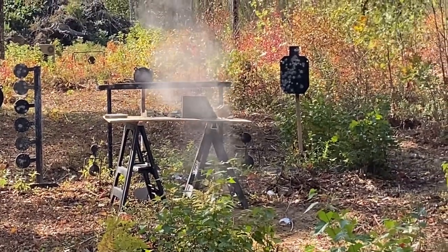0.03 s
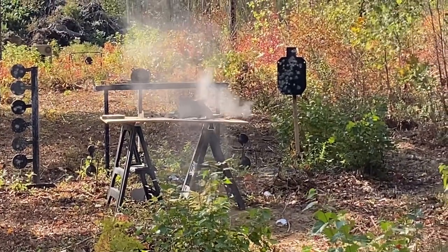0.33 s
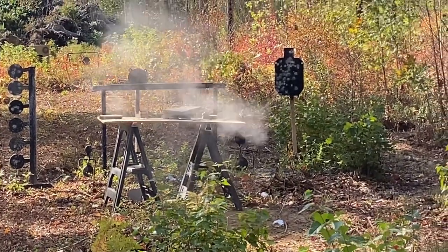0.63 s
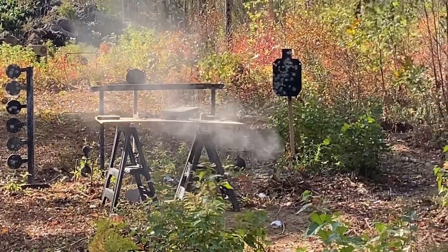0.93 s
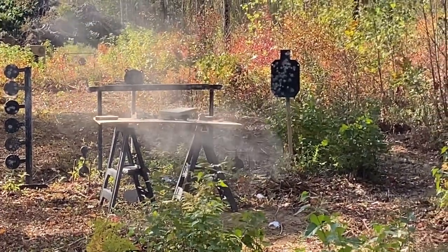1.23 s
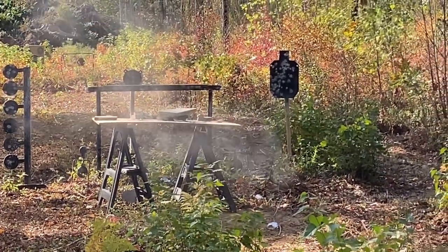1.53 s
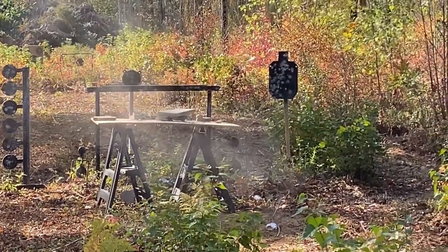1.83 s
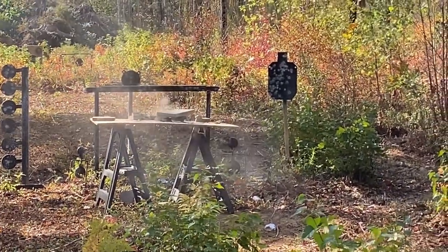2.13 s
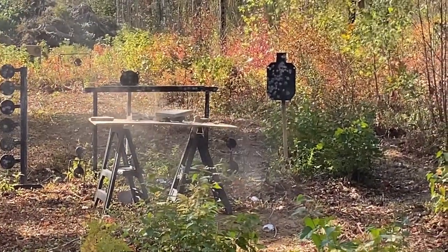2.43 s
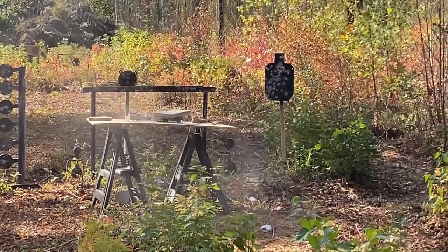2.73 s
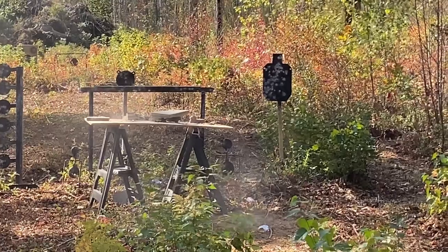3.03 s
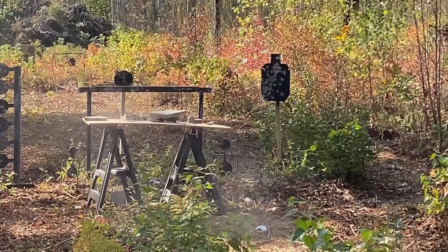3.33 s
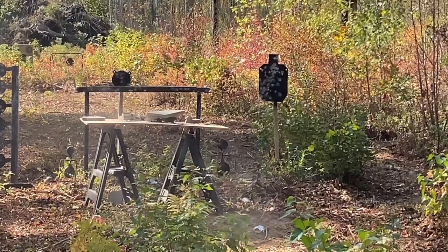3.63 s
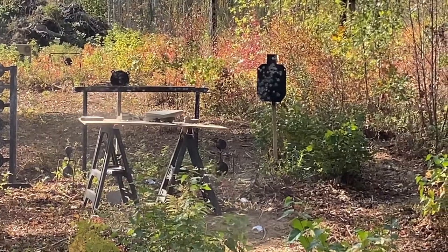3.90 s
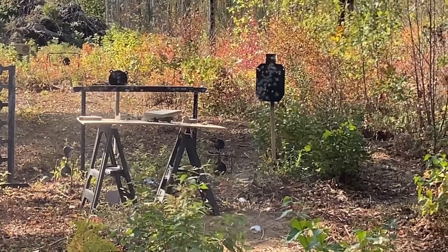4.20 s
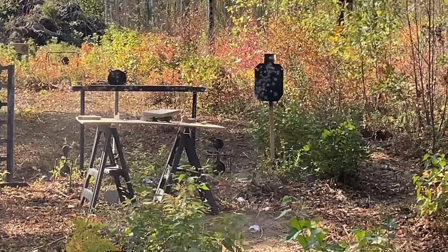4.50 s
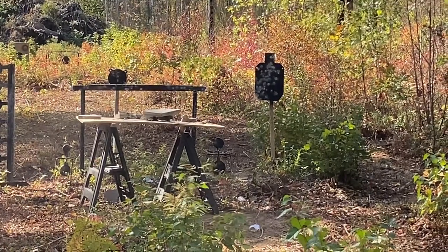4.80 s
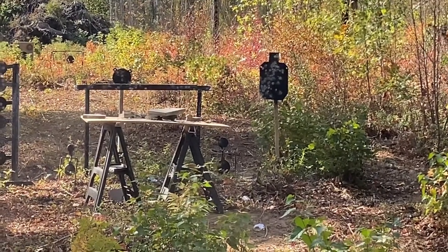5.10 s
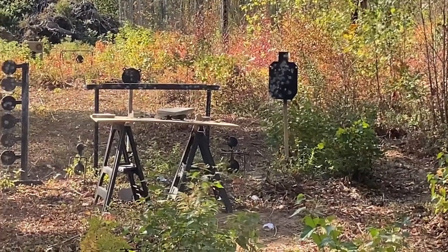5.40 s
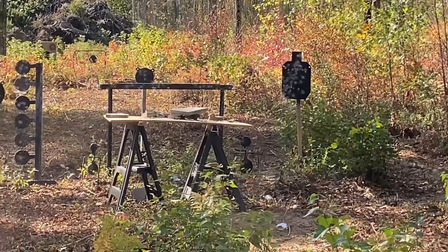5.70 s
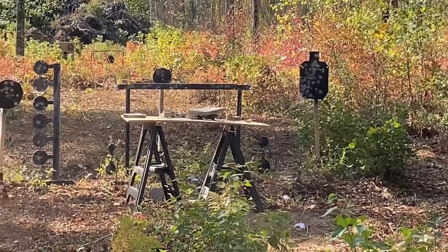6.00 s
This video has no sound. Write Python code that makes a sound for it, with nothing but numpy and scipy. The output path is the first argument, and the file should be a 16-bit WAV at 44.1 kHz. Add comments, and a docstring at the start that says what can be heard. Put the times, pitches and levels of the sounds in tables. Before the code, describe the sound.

Eight sharp gunshots fire at an uneven pace on an outdoor range, the later ones hitting steel targets that clang and ring.

```python
"""Eight gunshots at an uneven pace, from a microphone pair beside the shooter on a range by a wood.
Each is a sharp crack and a muzzle blast, scattered by the ground close by, echoed by the range
and held by the trees farther off. Downrange, four of the last five bullets set steel ringing.
A few faint dull thumps fall between and after the shots, over the low rumble of still outdoor air."""
import sys
import numpy as np
from scipy import signal
from scipy.fft import rfft, irfft, next_fast_len
from scipy.io import wavfile

SR = 44100
rng = np.random.default_rng(int(sys.argv[2]) if len(sys.argv) > 2 else 0)


def int16_out(signal):
    """Quantize to a 16-bit WAV file."""
    q = np.round(np.clip(np.atleast_2d(signal).T, -1, 1) * 32767)
    wavfile.write(sys.argv[1], SR, q.astype(np.int16))


N = 271215
SIZE = 54000  # samples in one shot and its tail
AGE = np.arange(SIZE) / SR
HZ = np.maximum(np.arange(SIZE // 2 + 1) * SR / SIZE, 1)
SIDE = np.array([[-.5], [.5]])  # splits a difference between left and right

# Colour of the crack, also of the steel's splash and shimmer. Each row: frequency in Hz, level in dB.
CRACK_SPECTRUM = [(200, -32), (700, -5), (1400, -9), (2400, -10), (4000, -16), (6200, -19.5), (8500, -14),
                  (10200, -7), (11800, -5), (13500, -20.5), (15500, -32.5)]


def undb(db):
    """Decibels to gain."""
    return 10 ** (np.asarray(db) / 20)


def fade(age, t60):
    """Full level until age zero, then down 60 dB every t60 seconds."""
    return np.exp(-np.log(1000) * np.maximum(age, 0) / t60)


def along(points, hz):
    """Read (Hz, value) points on a log-frequency axis."""
    point_hz, value = np.transpose(points)
    return np.interp(np.log(np.maximum(hz, 1)), np.log(point_hz), value)


def bins(x):
    """The frequencies of a signal's spectrum."""
    return np.arange(x.shape[-1] // 2 + 1) * SR / x.shape[-1]


def causal(points):
    """Minimum-phase response of a (Hz, dB) spectrum."""
    cepstrum = irfft(np.log(undb(along(points, HZ))))
    cepstrum[1:SIZE // 2] *= 2
    cepstrum[SIZE // 2 + 1:] = 0
    return np.exp(rfft(cepstrum))


def add(out, start_s, sound):
    """Mix a sound in, cut short of the buffer's end, where filtering wraps round."""
    start = int(start_s * SR)
    sound = sound[..., :min(N - start, SIZE - SIZE // 16)]
    out[:, start:start + sound.shape[-1]] += sound


def diffuse(size):
    """Spectra of white noise reaching the two microphones from all round."""
    # Each row: frequency in Hz, share of the power that differs between the microphones.
    unrelated = [(100, 0.1), (300, 0.27), (650, 0.86), (3800, 0.8), (4600, 0.017)]
    common, left, right = rng.standard_normal((3, size))
    own = along(unrelated, bins(common))
    return np.sqrt(1 - own) * rfft(common) + np.sqrt(own) * rfft([left, right])


def air():
    """Still outdoor air all round the microphones, with a low rumble."""
    # Each row: frequency in Hz, level in dB.
    spectrum = [(20, -60.5), (55, -41), (125, -59), (220, -63.5), (420, -59.5), (1000, -57), (2000, -68.5),
                (4000, -89.5), (7000, -102), (10500, -92.5), (15000, -103)]
    size = next_fast_len(N)
    hz = np.arange(size // 2 + 1) * SR / size
    return irfft(diffuse(size) * undb(along(spectrum, hz)), size)[:, :N]


def crack(rise_s=0.0012, hold_s=0.0024, t60=0.013):
    """A few milliseconds of ragged shock fronts."""
    burst = irfft(diffuse(SIZE)) * np.minimum(AGE / rise_s, 1) ** 2 * fade(AGE - hold_s, t60)
    return irfft(rfft(burst) * causal(CRACK_SPECTRUM))


def pulse(points, sweep_cycles=1.274, knee_hz=12):
    """Spectrum of one pressure pulse as heard: its lows come late, so that it sweeps down into a thud."""
    return causal(points) * np.exp(-2j * np.pi * sweep_cycles * np.log((HZ + knee_hz) / SR))


def blast(dull_hz=3000, lag_s=0.0021):
    """Spectrum of the muzzle blast at close range, just behind the crack."""
    # Each row: frequency in Hz, level in dB ahead of the low-pass.
    spectrum = [(20, 14.5), (35, 22.5), (60, 34), (140, 36), (205, 34.5), (255, 26.5), (292, 32),
                (355, 25.5), (465, 36.5), (520, 32.5), (625, 18), (830, 27), (1400, 18.5), (2500, 4.5)]
    lowpass = 1 / (1 + 1j * HZ / dull_hz - (HZ / dull_hz) ** 2)
    return pulse(spectrum) * lowpass * np.exp(-2j * np.pi * HZ * lag_s)


def scatter(rise_s=0.001, t60=0.18):
    """Dense early reflections from leaf litter and benches close by."""
    # Each row: frequency in Hz, level in dB.
    spectrum = [(30, -20), (80, -6), (220, -4), (420, -11.5), (630, -9), (1000, -4), (1400, -6.5),
                (2200, -14), (3500, -20), (6000, -31.5), (8500, -25.5), (10800, -15), (13000, -24),
                (15500, -47.5)]
    burst = irfft(diffuse(SIZE)) * np.minimum(AGE / rise_s, 1) * fade(AGE, t60)
    return irfft(rfft(burst) * causal(spectrum))


def echoes(smear_s=.0016, size=1024, deep_s=0.15, deep_width_s=0.012):
    """Response of rough reflectors: a broad bright band from near, a narrow low one from the trees."""
    # Ground, berms and trunks. Each row: delay in seconds, level in dB.
    reflectors = [(.0052, 3.5), (0.0212, -5), (0.0375, -20), (.0740, -13.5), (0.1272, -20.5), (0.1724, -22),
                  (0.191, -18), (0.232, -31), (0.323, -28.5)]
    near_hz, near_octaves = 1070, 0.96
    far_hz, far_octaves = 413, 0.64
    lag = np.arange(size) - size // 2
    window = np.exp(-.5 * (lag / SR / smear_s) ** 2)
    out = np.zeros((2, SIZE))
    for delay_s, db in reflectors:
        depth = .5 + .5 * np.tanh((delay_s - deep_s) / deep_width_s)  # 0 close by, 1 deep in the wood
        hz = near_hz + depth * (far_hz - near_hz)
        octaves = near_octaves + depth * (far_octaves - near_octaves)
        band = np.exp(-.5 * (np.log2((bins(lag) + 1) / hz) / octaves) ** 2)
        burst = irfft(rfft(irfft(diffuse(size)) * window) * band)
        burst *= np.sqrt(2 * np.mean(band ** 2) / np.sum(burst ** 2))  # about unit gain mid-band
        out[:, lag + int(delay_s * SR)] += undb(db) * burst
    return rfft(out)


def surroundings(muzzle):
    """What the range sends back early: echoes of the blast and scatter from the ground."""
    return irfft(muzzle * echoes()) + scatter()


def trunks(patchy_db=1.0, patch_s=0.0029, clearing_db=-1.5, edge_s=0.14, edge_width_s=0.004):
    """Strength of the patchy returns by delay: weaker from the clearing, fuller from the trees."""
    knots = np.arange(0, AGE[-1], patch_s)
    patches_db = patchy_db * np.interp(AGE, knots, rng.standard_normal(SIZE)[:len(knots)])
    in_clearing = .5 - .5 * np.tanh((AGE - edge_s) / edge_width_s)
    return undb(patches_db + clearing_db * in_clearing)


def woods(patches, rise_s=0.03, hold_s=0.18):
    """The wood holds the shot while the front crosses the tree line, then fades band by band."""
    # Each row: frequency in Hz, level in dB.
    spectrum = [(25, -34.5), (45, -22.5), (70, -24.5), (220, -33), (400, -23.5), (650, -27.5),
                (1150, -23.5), (2200, -35.5), (3500, -44), (6000, -59), (10800, -50.5), (12800, -62.5),
                (15500, -78)]
    # Each row: band centre in Hz, seconds to fall 60 dB.
    decay = [(50, 1.2), (150, 0.66), (400, 1.1), (1000, 1.16), (2200, 0.91), (5000, 0.58), (11000, 0.76)]
    returns = rfft(irfft(diffuse(SIZE)) * patches) * undb(along(spectrum, HZ))
    centres, t60s = np.transpose(decay)
    out = 0
    for share, t60 in zip(np.eye(len(centres)), t60s):
        band = along(np.c_[centres, share], HZ)
        out += irfft(returns * band) * fade(AGE - hold_s, t60)
    return out * np.minimum(AGE / rise_s, 1)


def boom(hz=48, level_db=-40, peak_s=0.16, spread_s=0.041):
    """A deep note that rolls back across the range."""
    swell = np.exp(-.5 * ((AGE - peak_s) / spread_s) ** 2)
    return undb(level_db) * swell * np.sin(2 * np.pi * hz * AGE)


def gun(fresh_share=0.36):
    """Shots beside the microphones. All meet the same range and trees, so most early echoes repeat."""
    # Each row: start in seconds, gain of the blast and its returns in dB, gain of the crack in dB.
    shots = [(0.189, -3.5, -3), (1.263, -2.87, 0.5), (1.9376, -3, 2), (3.1635, -2, 0), (3.4724, -2.3, 1),
             (4.0183, -2.35, 0), (4.4946, -2.5, 2), (4.946, -2.5, 2)]
    out = np.zeros((2, N))
    muzzle, roll, patches = blast(), boom(), trunks()
    direct, usual = irfft(muzzle), surroundings(muzzle)
    for start_s, blast_db, crack_db in shots:
        early = np.sqrt(1 - fresh_share) * usual + np.sqrt(fresh_share) * surroundings(muzzle)
        report = direct + early + woods(patches) + roll
        add(out, start_s, undb(blast_db) * report + undb(crack_db) * crack())
    return out


def thumps():
    """Faint dull thumps, each one low pressure pulse."""
    # Each row: start in seconds, gain in dB.
    events = [(0.946, -39.5), (1.001, -43.5), (1.134, -45.5), (2.828, -40.5), (2.925, -39.5), (3.004, -34),
              (3.049, -38), (6.099, -38.5)]
    # Each row: frequency in Hz, level in dB.
    spectrum = [(20, 7), (55, 40), (120, 27.5), (300, 11), (600, -1), (2000, -16.5), (6000, -60)]
    out = np.zeros((2, N))
    thump = irfft(pulse(spectrum))
    for start_s, db in events:
        add(out, start_s, undb(db) * thump)
    return out


def ring(modes, size, strike_db, waver_db, waver_s=0.082):
    """Decaying modes: the strike point weights them by chance, and their levels waver slowly at random."""
    age = np.arange(size) / SR
    knots = np.arange(0, N / SR, waver_s)
    out = 0
    for hz, db, t60 in modes:
        chance = rng.standard_normal(SIZE // 64)
        waver = np.interp(age, knots, chance[:len(knots)])
        gain = undb(db + strike_db * chance[-1] + waver_db * waver)
        out += gain * fade(age, t60) * np.sin(2 * np.pi * hz * age)
    return out


def shimmer(size, count=30, low_hz=4500, high_hz=15000, gain_db=-44, t60=0.6):
    """The steel's crowded high modes: each bullet wakes a different handful."""
    hz = rng.uniform(low_hz, high_hz, count)
    modes = np.c_[hz, gain_db + along(CRACK_SPECTRUM, hz), np.full(count, t60)]
    return ring(modes, size, strike_db=2, waver_db=5)


def splash(gain_db=-30, t60=0.099):
    """A bullet splashes on the steel with a short bright hiss."""
    burst = irfft(diffuse(SIZE)) * fade(AGE, t60)
    return undb(gain_db) * irfft(rfft(burst) * causal(CRACK_SPECTRUM))


def steel_targets(long_right_db=7, rise_s=0.0334, pivot_hz=6000, favour_db=7, favour_octaves=0.031):
    """Steel targets downrange: at each hit a bright short ring, and a long lower ring to the right."""
    # Each row: start in seconds, gains in dB of the bright ring, the long ring and the splash,
    # treble tilt in dB per octave, frequency in Hz that the strike point favours.
    hits = [(3.232, 0.5, -29, 2.5, 4.5, 3553), (4.086, 0, -15.5, 3.5, 2.3, 6530),
            (4.563, -1, -3, 5, -1, 5044), (5.014, 2, -0.5, 4, 2, 3840)]
    # Modes of the two rings. Each row: frequency in Hz, level in dB, seconds to fall 60 dB.
    long_modes = [(730, -68.5, 4), (1148, -56, 3.8), (1534, -44.5, 4.5), (2150, -59.5, 1.6)]
    bright_modes = [(1803, -48.5, 1.4), (2148, -46.5, 1), (2153, -46, 0.7), (2946, -58, .8),
                    (3128, -56, .7), (3553, -57.5, .85), (3892, -61, 0.85), (4099, -57, .8),
                    (5044, -57, .6), (5475, -57, .55), (5879, -56.5, .62), (6207, -56, .6), (6471, -57, .7),
                    (6804, -55, .4), (7173, -57.5, .5), (7790, -58, .6), (7836, -56, .6), (8167, -56.5, .6),
                    (9670, -50, .55), (10260, -46.5, .6), (10580, -46.5, .4), (11150, -46, .45),
                    (11403, -45.5, .45), (12183, -48.5, .4), (12594, -46, .45), (13890, -54, .4),
                    (14377, -52, .4), (15012, -56, .4)]
    out = np.zeros((2, N))
    sizes = np.diff([int(hit[0] * SR) for hit in hits] + [N + SR // 10])
    mode_hz, mode_db, t60 = np.transpose(bright_modes)
    for (start_s, bright_db, long_db, splash_db, tilt_db, favoured_hz), size in zip(hits, sizes):
        favour = favour_db * np.exp(-.5 * (np.log2(mode_hz / favoured_hz) / favour_octaves) ** 2)
        tilt = tilt_db * np.log2(mode_hz / pivot_hz)
        struck = np.c_[mode_hz, mode_db + favour + tilt, t60]
        bright = undb(bright_db) * (ring(struck, size, strike_db=4, waver_db=3.5) + shimmer(size))
        low = undb(long_db + SIDE * long_right_db) * ring(long_modes, size, strike_db=.2, waver_db=.7)
        edge = np.minimum(np.arange(size) / SR / rise_s, 1)  # the ring builds as its reflections arrive
        add(out, start_s, (bright + low) * edge * edge[::-1])  # and fades out before the next hit
        add(out, start_s, undb(splash_db) * splash())
    return out


def scene():
    """The range at the microphone pair: the right hears more midrange, and the treble is out of step."""
    # Each row: frequency in Hz, right minus left in dB.
    right_db = [(500, 0.5), (900, 4.5), (1300, 5.5), (2200, 4.1), (3800, 7), (5200, 0)]
    # Each row: frequency in Hz, the right microphone's lead in radians.
    right_lead = [(100, 0), (280, -.5), (500, 0), (7400, .1), (8800, 3.1), (11000, 6.2), (12900, 9.1),
                  (14400, 10), (16000, 12)]
    sound = gun() + steel_targets() + air() + thumps()
    padded = np.pad(sound, ((0, 0), (0, next_fast_len(N + SR // 10) - N)))
    hz = bins(padded)
    pair = undb(SIDE * along(right_db, hz)) * np.exp(1j * SIDE * along(right_lead, hz))
    return irfft(rfft(padded) * pair, padded.shape[-1])[:, :N]


def record(dry):
    """The recorder rounds off the peaks of the blasts and cuts the top."""
    ceiling, top_hz = .88, 16300
    rounded = dry / (1 + (dry / ceiling) ** 4) ** (1 / 4)
    return signal.sosfilt(signal.ellip(8, .2, 70, top_hz, fs=SR, output="sos"), rounded)


dry = scene()
out = record(dry)
int16_out(out)
```